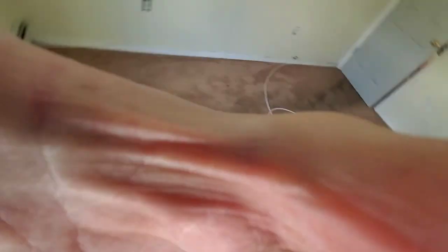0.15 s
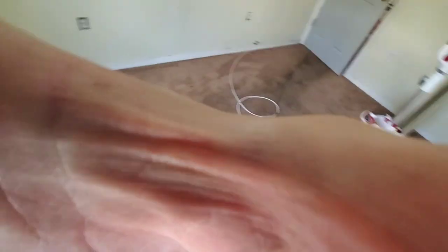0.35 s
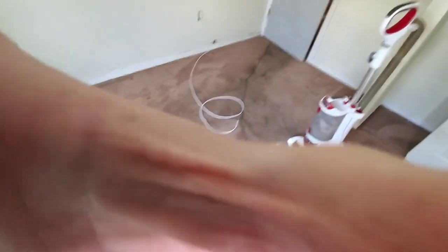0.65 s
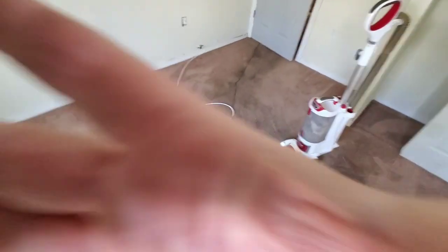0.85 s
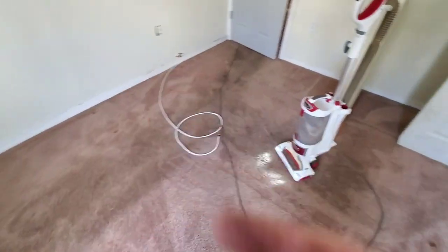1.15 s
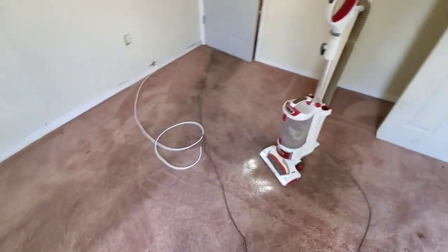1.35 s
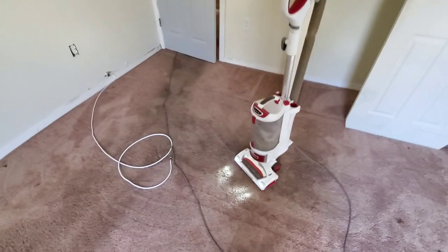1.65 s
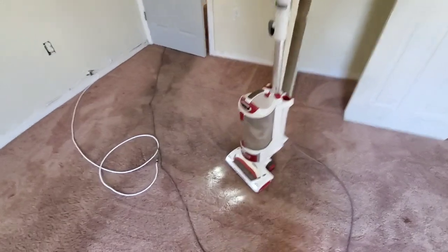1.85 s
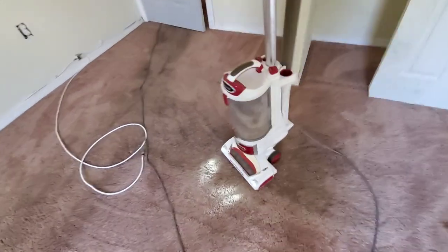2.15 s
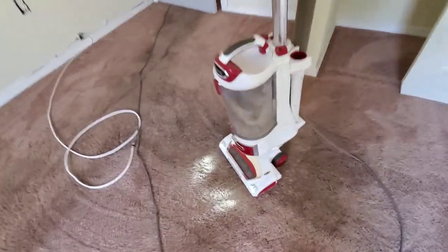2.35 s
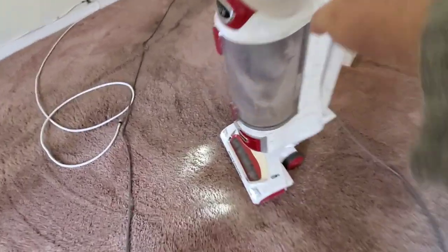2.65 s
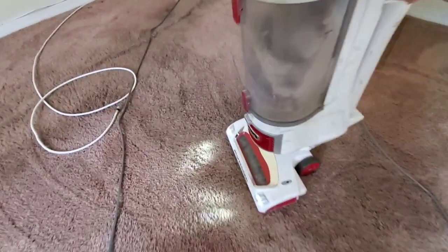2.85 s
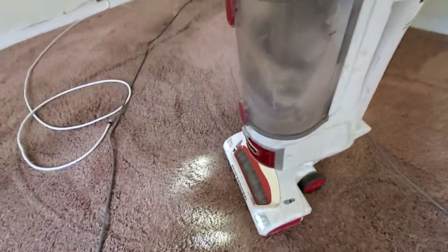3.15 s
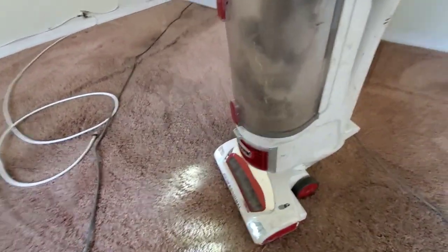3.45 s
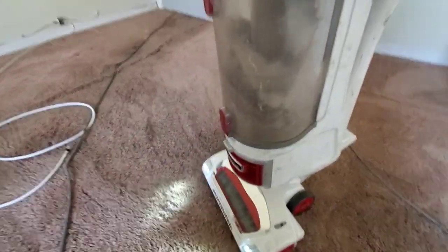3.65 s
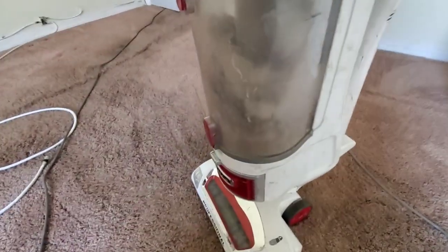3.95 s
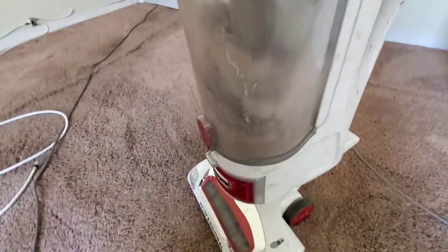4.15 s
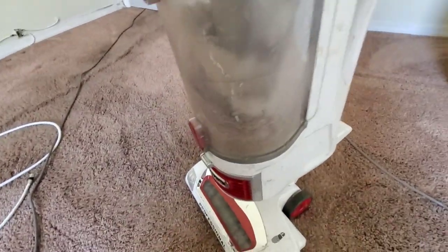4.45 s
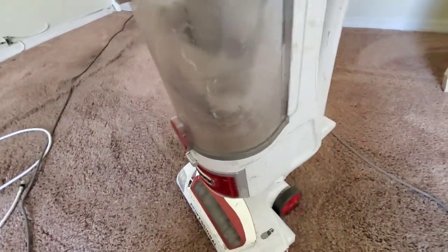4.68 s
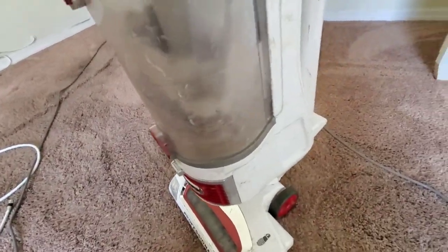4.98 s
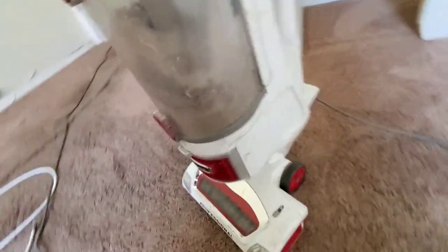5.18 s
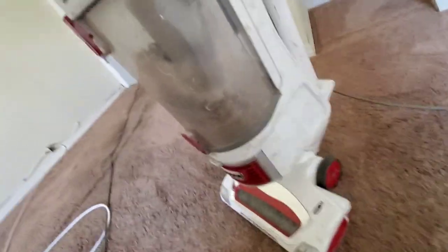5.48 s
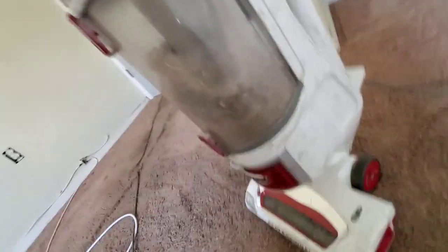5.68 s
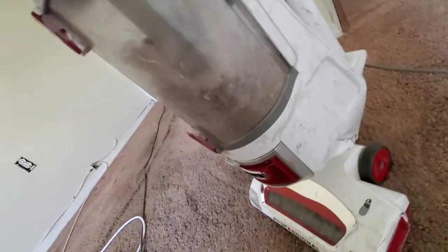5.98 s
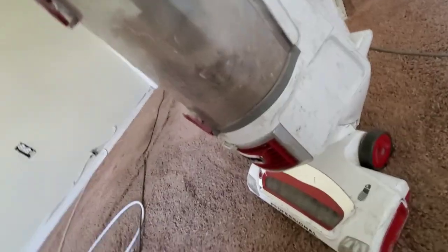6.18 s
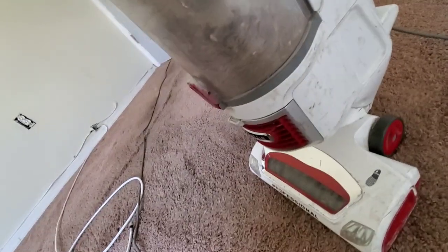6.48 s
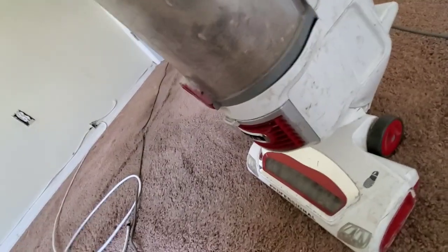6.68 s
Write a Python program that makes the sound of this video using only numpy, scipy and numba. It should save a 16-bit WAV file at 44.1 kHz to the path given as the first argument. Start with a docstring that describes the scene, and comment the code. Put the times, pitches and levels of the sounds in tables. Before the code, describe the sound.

In an empty carpeted room an upright vacuum runs steadily: motor hum, rushing air, a breathy whistle and dense gritty hiss. A hand rumbles and rustles on the handheld phone for the first second, muffling the right side. The phone moves close to the plastic bin; the motor is switched off, its hum falls, grit thins to single ticks, and finally the bin unlatches with clicks, low knocks and a scrape.

```python
"""Vacuum cleaner switched off and its bin lifted

An upright cleaner runs on carpet in an empty room: sines hum for its fan and brush drive, filtered noise
makes the rush of air and the whistle, and random grains of grit tick and ring in its plastic cyclone bin.
A hand rubs on the phone and muffles its right microphone for the first second. After switch-off the hum
falls and the grit thins into single ticks; then the bin is unlatched with clicks, knocks and a scrape."""
import sys
import numpy as np
from scipy import signal
from scipy.fft import rfft, irfft
from scipy.io import wavfile
from scipy.ndimage import uniform_filter1d
from numba import njit

SR = 44100
rng = np.random.default_rng(int(sys.argv[2]) if len(sys.argv) > 2 else 0)


def unload_audio(sound):
    """Save the sound as a 16-bit wav file, at the path given as the first command line argument."""
    columns = np.transpose(np.atleast_2d(sound))
    # keep every value between -1 and 1, then stretch to whole-number steps
    steps = np.round(np.clip(columns, -1, 1) * 32767)
    wavfile.write(sys.argv[1], SR, steps.astype(np.int16))


N = 300762
T = np.arange(N) / SR  # time of every sample, in seconds

# Colour of the bin wall's ring. Each row: frequency in Hz, relative level in dB.
WALL_SPECTRUM = [(600, -44.5), (1000, -13), (1200, -8.5), (1400, -10.5), (1530, -4.5), (1680, -4),
                 (1980, 1), (2350, 0), (2560, 1.5), (2800, -0.5), (3280, 1.5), (3700, 0.5), (4100, -2.5),
                 (4800, -8.5), (6500, -10.5), (12000, -14.5)]
# Colour of the grains' ticks. Each row: frequency in Hz, relative level in dB.
TICK_SPECTRUM = [(2000, -39.5), (4500, 0.5), (5500, -6), (7000, 0), (7700, -1.5), (9000, 2.5), (10200, 3),
                 (11000, 1), (12200, 5), (14000, -2), (16000, 2.5)]

# fan shaft: turns per second, switch-off time, and slowing by air drag (at full speed) and by friction
RUN_HZ, OFF_S, DRAG_HZ_PER_S, FRICTION_HZ_PER_S = 615, 3.855, 459, 53.1
# the phone moves in close to the bin between these times
APPROACH_S, CLOSE_S = 2.1, 2.95
LAP_S = .04608  # time of one lap of the vortex
ROOM_T60_S = 1  # time for the room's echo to fall by 60 dB


def undb(db):
    """Turn decibels into a gain."""
    return 10 ** (np.asarray(db) / 20)


def curves(table):
    """The columns of a table, joined by straight lines in time."""
    s, *columns = np.transpose(table)
    return [np.interp(T, s, c) for c in columns]


def humps(x, rows):
    """Sum of bell-shaped swells, each (centre, width, height)."""
    return sum(height * np.exp(-((x - centre) / width) ** 2) for centre, width, height in rows)


def unit(x):
    """Scale to an rms level of 1."""
    return x / np.sqrt(np.mean(x ** 2, axis=-1, keepdims=True))


def sides(db):
    """Left and right gains for a level difference, left minus right."""
    gains = np.array([undb(np.atleast_1d(db) / 2), undb(-np.atleast_1d(db) / 2)])
    return gains / np.sqrt(np.mean(gains ** 2, axis=0))


def walk(rate):
    """Smooth random wandering with about `rate` new values a second and a spread near 1."""
    k = int(SR / rate)
    held = np.repeat(rng.standard_normal(N // k + 1), k)
    return unit(uniform_filter1d(held, k)[:N])


def convolve(x, response):
    """Pass every channel of x through a response."""
    x = np.atleast_2d(x)
    return signal.fftconvolve(x, np.atleast_2d(response), axes=-1)[:, :x.shape[-1]]


def colour(x, spectrum, size=4096):
    """Filter with the given spectrum and unit energy that only looks back in time."""
    hz, db = np.transpose(spectrum)
    log_hz = np.log(np.fft.rfftfreq(size, 1 / SR) + 1)
    # folding the cepstrum packs the response as early as it can be (minimum phase)
    cepstrum = irfft(np.log(undb(np.interp(log_hz, np.log(hz), db))))
    cepstrum[1:size // 2] *= 2
    cepstrum[size // 2 + 1:] = 0
    response = irfft(np.exp(rfft(cepstrum)))
    return convolve(x, unit(response) / np.sqrt(size))


@njit
def svf(x, hz, damping):
    """State-variable filter with a moving centre: low-pass and band-pass."""
    out, b, l = np.empty((2, len(x))), 0., 0.
    for i in range(len(x)):
        g = np.tan(np.pi * hz[i] / SR)
        v = (b + g * (x[i] - l)) / (1 + g * (g + damping))
        out[0, i], out[1, i] = l + g * v, damping * v
        b, l = 2 * v - b, l + 2 * g * v
    return out


def resonance(x, hz, width_hz):
    """A fixed band-pass, gain 1 at the centre."""
    return signal.lfilter(*signal.iirpeak(hz, hz / width_hz, fs=SR), x)


def add(out, s, sound):
    """Mix a sound in at a time."""
    i = int(s * SR)
    out[:, i:i + sound.shape[-1]] += sound[:, :N - i]


def diffuse(alike_hz=900):
    """Room-filling noise: long waves are nearly the same at both microphones."""
    mid, side = rng.standard_normal((2, N))
    side = signal.sosfilt(signal.butter(1, alike_hz, "high", fs=SR, output="sos"), side)
    return mid + side * np.array([[1], [-1]])


def ringing(energy, t60):
    """Countless close modes: each blow leaves a dying puff of noise, different at each microphone."""
    keep = np.exp(-2 * np.log(1000) / (t60 * SR))
    return np.sqrt(signal.lfilter([1 - keep], [1, -keep], energy)) * rng.standard_normal((2, N))


def room(energy, wet_db):
    """Bare walls prolong the blows with a dying tail of noise."""
    return undb(wet_db) * ringing(energy, ROOM_T60_S)


def struck(modes, size=6000):
    """Damped modes after one blow, a little different in pitch each time."""
    t = np.arange(size) / SR
    sound = np.zeros(size)
    for hz, db, t60 in modes:
        pitch = hz * (1 + 0.014 * rng.standard_normal())
        sound += undb(db) * np.exp(-np.log(1000) * t / t60) * np.sin(2 * np.pi * pitch * t)
    return sound


def speed():
    """Share of full fan speed: steady, then braked by drag (as speed squared) and constant friction."""
    knee = np.sqrt(FRICTION_HZ_PER_S / DRAG_HZ_PER_S)  # the share at which both brake equally
    coasted = np.maximum(T - OFF_S, 0) * knee * DRAG_HZ_PER_S / RUN_HZ
    return knee * np.tan(np.arctan(1 / knee) - coasted)


def nearness():
    """0 across the room, 1 beside the bin."""
    return np.interp(T, [APPROACH_S, CLOSE_S], [0, 1])


def skin(cover, gap_hz):
    """The palm rumbles and bumps on the phone; its rustle grows from the slide to the peeling off."""
    # The palm bumping the phone. Each row: start in seconds, thump level in dB, skin rumble level in dB.
    bumps = [(.003, -17, -23), (.032, -16, -25), (.054, -11, -20), (.147, -8, -25), (.163, -14, -27),
             (.208, -5, -21), (.33, -19, -30), (.579, -10, -24), (.64, -17, -27), (.803, -9, -24),
             (.889, -13, -20), (.91, -11, -18), (.927, -7, -16), (.936, -7, -16), (.955, 0, -18)]
    # Colour of the skin's rumble. Each row: frequency in Hz, relative level in dB.
    rumble_spectrum = [(20, -8), (45, -2.5), (80, 0), (130, -20.5), (250, -24), (700, -32), (3000, -37),
                       (16000, -68)]
    thump_modes = [(59.5, -7.5, 0.07), (106, -4.5, 0.013)]  # Hz, relative dB, 60 dB decay in seconds
    slip_s, peel_s = .8, .938  # the palm starts to slide, then peels off
    rest_db, rustle_rest_db, slip_db, peel_db, hiss_db = -34, -46, -35, -13, -15
    catch_db = 2  # how unevenly the skin catches and slips
    bump_s, touch_hz = 0.013, 3500  # fading time of a bump's rumble; gap pitch at which touch is lost

    touching = cover / (1 + (gap_hz / touch_hz) ** 8)
    pressure = undb(rest_db + catch_db * walk(21.2)) * touching
    for s, _, db in bumps:
        pressure += undb(db) * (T >= s) * np.exp(-np.abs(T - s) / bump_s)
    rumble = pressure * unit(colour(rng.standard_normal(N), rumble_spectrum))
    for s, db, _ in bumps:
        add(rumble, s, undb(db) * struck(thump_modes)[None])

    rustle_db = np.where(T < slip_s, rustle_rest_db, np.interp(T, [slip_s, peel_s], [slip_db, peel_db]))
    in_gap = svf(rng.standard_normal(N), gap_hz, 1.0)[0] * np.sqrt(SR / np.pi / gap_hz)
    hiss_spectrum = [(1500, -5), (3500, -7), (7000, -20), (16000, -26)]
    hiss = undb(hiss_db) * colour(rng.standard_normal(N), hiss_spectrum)[0]
    rustle = undb(rustle_db + catch_db * walk(110)) * touching * (in_gap + hiss)
    return signal.sosfilt(signal.butter(2, 24, "high", fs=SR, output="sos"), rumble[0] + rustle)


def hand(sound):
    """A palm muffles the right port and shades the left; the gap passes more as its pitch rises."""
    # The gap under the palm. Each row: time in seconds, resonance in Hz.
    gap_pitch = [(0, 300), (.57, 410), (.62, 2200), (.67, 3000), (.71, 4870), (.75, 5740), (.785, 4300),
                 (.81, 500), (.87, 260), (.925, 420), (.938, 800), (.951, 1300), (.955, 6000),
                 (.959, 11500), (.968, 14000)]
    lift_s, lift_time_s = .96, .015  # the palm leaves the port
    open_db, open_hz, gap_db_per_octave = -3.5, 5500, 5.0  # the gap loses level below open_hz
    leak_db, shade_db, cup_db = -18, -2, 2.5
    leak_spectrum = [(100, 0), (650, 4.0), (1500, -4.0), (3800, -9),
                     (5500, -14), (7300, -24), (8800, -13), (15000, -37)]

    left, right = sound
    gap_hz = np.clip(curves(gap_pitch)[0], 50, SR / 3)
    cover = np.interp(T, [lift_s, lift_s + lift_time_s], [1, 0])
    leak = undb(leak_db) * colour(right, leak_spectrum)[0]
    gap_db = open_db + gap_db_per_octave * np.minimum(np.log2(gap_hz / open_hz), 0)
    through_gap = undb(gap_db) * svf(svf(right, gap_hz, 0.36)[0], gap_hz, 27)[1]
    right = (1 - cover) * right + cover * (leak + through_gap)
    # at first the palm also reflects treble into the left port
    glint = 1.17 * resonance(left, 9300, 4000) + 0.87 * resonance(left, 12700, 1060)
    glint -= 0.31 * resonance(left, 8700, 16000)
    left = (left + glint * np.interp(T, [.62, .72], [1, 0])) * undb(shade_db * cover)
    # as it lifts, the hollow of the hand briefly gathers the sound
    cupped = undb(humps(T, [(lift_s + lift_time_s / 2, lift_time_s, cup_db)]))
    return cupped * np.array([left, right]) + np.array([[0], [1]]) * skin(cover, gap_hz)


def motors():
    """The unbalanced fan hums at its shaft rate; the brush drive's steady note just above beats with it."""
    # Room standing waves that the falling hum sweeps through. Each row: centre in Hz, width in Hz, gain in dB.
    standing_waves = [(596, 9, 7), (536, 9.2, 3), (506, 13, 8.5), (478, 9.5, 8.5), (432, 22, -0.5),
                      (383.5, 13, -23), (318, 45, -9.5), (238, 3.8, -16), (223.6, 4.8, -20),
                      (199, 10, -11.5), (150, 17, 6)]
    # Hums of the brush roll. Each row: frequency in Hz, level in dB relative to the roll.
    brush_lines = [(119.7, -1), (179.8, 2), (213, -2), (256.5, 4), (302, 0)]
    hum_db, hum_near_db = -47.5, 5  # from afar, and its change close up
    brush_hz, note_db, roll_db, roll_near_db = 641.6, -40.5, -57.5, -15
    brush_stop_db_per_s = 221
    fan_flutter_db, lap_db, fan_wander, fan_jitter = 3, 2, .004, .011  # the last two are shares of speed
    note_flutter_db, roll_flutter_db = 2.6, 3  # the carpet loads the brush drive and roll unevenly

    hz, near = RUN_HZ * speed(), nearness()
    stop_db = -brush_stop_db_per_s * np.maximum(T - OFF_S, 0)
    lag = np.array([[0], [0.45]])  # the right channel's phase shift, in radians
    # the air load shakes the fan mostly while it turns fast, at random and with each lap of the vortex
    load = speed() ** 3
    shaken_hz = hz * (1 + load * (fan_wander * walk(1.5) + fan_jitter * walk(30)))
    turn = 2 * np.pi * np.cumsum(shaken_hz) / SR
    flutter = fan_flutter_db * walk(60) + lap_db * np.sin(2 * np.pi * T / LAP_S)
    fan_db = hum_db + hum_near_db * near + humps(hz, standing_waves) + load * flutter
    fan = undb(fan_db) * np.sin(turn + lag * load)

    note_phase = 2 * np.pi * brush_hz * T + 0.71 * walk(5.0) + lag
    note = undb(note_db + stop_db + note_flutter_db * walk(32)) * np.sin(note_phase)
    roll = np.zeros(N)
    for line_hz, db in brush_lines:
        level_db = roll_db + roll_near_db * near + stop_db + db + roll_flutter_db * walk(11.0)
        roll += undb(level_db) * np.sin(2 * np.pi * line_hz * T + 0.5 * walk(9))
    return np.sqrt(2) * (fan + note + roll)


def air(air_db):
    """Turbulent exhaust air fills the room as noise; it grows duller and calmer as the fan slows."""
    # Colour of the rushing air. Each row: frequency in Hz, relative level in dB.
    air_spectrum = [(30, -26), (70, -22), (110, -5), (170, -7), (290, 3), (380, -4), (470, -1), (600, 3),
                    (900, 3), (1300, 1.5), (2200, -1.5), (5000, -4), (15000, -20)]
    gain_db, least_db, flutter_db = 4.5, -48, 2
    reach, damping = 6.1, 2.5  # the low-pass edge lies at `reach` times the shaft rate
    edge_hz = np.clip(reach * RUN_HZ * speed(), 100, SR / 3)
    rush = np.array([svf(x, edge_hz, damping)[0] for x in colour(diffuse(), air_spectrum)])
    level = np.hypot(undb(air_db), undb(least_db))  # never quite silent
    return rush * level * undb(gain_db + flutter_db * speed() * walk(30))


def whirl():
    """Level of the grit in dB: it comes in surges, and wavers close to the bin."""
    # Level of the whirling grit. Each row: time in seconds, level in dB.
    whirl_level = [(1.0, -19.5), (1.93, -21.5), (2.0, -20.5), (2.62, -21), (2.82, -25), (3.72, -27.5),
                   (3.87, -22), (5.34, -33), (5.76, -35), (6.21, -39.5), (6.46, -40), (6.55, -48.5)]
    # Passing clumps of grit and lulls between them. Each row: centre in seconds, change in dB.
    surge_rows = [(1.08, 0.5), (1.17, -0.5), (1.43, 1), (1.52, 0.5), (1.9, -2), (2.28, 1), (2.58, 0.5),
                  (2.88, -3), (3.22, 2.5), (3.37, -2.5), (3.42, 1.5), (3.47, -1.5), (3.58, 2), (3.79, 3),
                  (4.21, 2.5), (4.52, -5), (4.61, 2.5), (4.68, -4.5), (5.0, -2.5), (5.91, -6.5)]
    surge_s, waver_db = .028, 0.82  # half-length of a surge; size of the wavering
    surges = humps(T, [(s, surge_s, db) for s, db in surge_rows])
    return curves(whirl_level)[0] + surges + waver_db * nearness() * walk(60)


def steady(x, seconds=0.19):
    """Even out the slow level of a sound."""
    return x / np.sqrt(uniform_filter1d(np.mean(x ** 2, axis=0), int(seconds * SR)) + 1e-9)


def from_bin(x):
    """Part of the bin's ring arrives directly and reaches the left microphone a little late."""
    direct_share, port_lag_s = .12, .00019
    left, right = x
    late = np.roll(right, int(port_lag_s * SR))
    return np.array([np.sqrt(1 - direct_share) * left + np.sqrt(direct_share) * late, right])


def facing(x):
    """Close up, the wall beams its top octave and lower treble recedes; slower grains tick lower."""
    near_db, slow_db, scoop_db, fill_db = 7, -7, -11.5, 6.0
    lift_db = near_db * nearness() + slow_db * (1 - speed()) ** 2
    scoop = undb(scoop_db * nearness() * speed() + fill_db * (0.5 - speed())) - 1
    return x + (undb(lift_db) - 1) * resonance(x, 14200, 2560) + scoop * resonance(x, 6600, 6100)


def whistle(whirl_db):
    """Turbulence rings the bin's air cavity; narrow noise drifts in pitch, flutters and swells."""
    # The breathy whistle. Each row: time in seconds, pitch in Hz, level in dB relative to the whirl.
    whistle_track = [(0, 1680, -15), (.25, 1690, -9.5), (.75, 1700, -9), (1.1, 1666, -12), (1.5, 1740, -8),
                     (1.9, 1738, -6), (2.3, 1672, -6), (2.7, 1672, -5.5), (2.95, 1670, -12.5),
                     (3.6, 1680, -13), (3.9, 1650, -10.5), (4.5, 1680, -14), (5.6, 1740, -16)]
    # Its swells and lulls. Each row: centre in seconds, change in dB.
    swell_rows = [(1.14, -7), (1.5, 3.5), (1.62, -2), (1.74, 2), (1.88, -3), (2.02, 3), (2.09, -3),
                  (2.17, 4), (2.41, 2.5), (2.49, -7), (2.6, 0), (2.75, -2)]
    swell_s, flutter_db = .035, 1.6  # half-length of a swell; size of the quick flutter
    width = .052  # as a share of the pitch
    hz, db = curves(whistle_track)
    hz = hz * (1 + 0.007 * walk(40))
    tone = []
    for noise in rng.standard_normal((2, N)):
        narrow = svf(noise, hz, width)[1]
        tone.append(svf(narrow, hz, 4 * width)[1])
    swells = humps(T, [(s, swell_s, height) for s, height in swell_rows])
    return steady(from_bin(tone), seconds=0.097) * undb(whirl_db + db + swells + flutter_db * walk(80))


def grit(ring_db, sizzle_db):
    """Sand circles the bin in clumps; each grain ticks on the wall and rings the shell."""
    far_grains_per_s, near_grains_per_s = 6900, 2700  # grains heard at full speed
    thinning, spread_db, clump_db, pan_db = 2.2, 2.0, 4.0, 1
    heard = far_grains_per_s + (near_grains_per_s - far_grains_per_s) * nearness()
    mean_rate = heard * speed() ** thinning
    rate = mean_rate * undb(clump_db * np.tanh(walk(55)))
    size = undb(spread_db * np.minimum(rng.exponential(size=N), 4.4))
    energy = size ** 2 * (rng.random(N) < rate / SR)
    ticks = ringing(energy, 0.00044) + 1.6 * ringing(energy, 0.008) + room(energy, wet_db=-2)
    rings = ringing(energy, 0.014) + room(energy, wet_db=2.5)
    # the fewer the grains, the more each passing clump stands out
    clumps = unit(np.tanh(walk(110)))
    swell_db = np.clip(4500 / mean_rate, 0, 1.4) * (clumps - uniform_filter1d(clumps, SR // 22))
    sizzle = steady(facing(colour(ticks, TICK_SPECTRUM))) * undb(sizzle_db + swell_db) * sides(pan_db)
    shell = steady(from_bin(colour(rings, WALL_SPECTRUM))) * undb(ring_db + swell_db)
    return sizzle + shell


def floor():
    """A faint noise rumble of the house and of the hand-held phone, whose level drifts."""
    # Colour of the rumble. Each row: frequency in Hz, relative level in dB.
    floor_spectrum = [(20, -8), (60, 4), (150, 2.5), (280, 1.5), (450, -1), (1200, -7), (4000, -13),
                      (16000, -30)]
    # Loudness of the rumble. Each row: time in seconds, level in dB.
    floor_level = [(0, -48), (2.3, -61), (3.7, -55), (4.6, -60), (5.1, -52.5), (5.6, -50), (6.3, -45.5),
                   (6.82, -40)]
    return unit(colour(diffuse(alike_hz=200), floor_spectrum)) * undb(curves(floor_level)[0] + 2 * walk(9))


def strays(whirl_db):
    """Scattered grains near the phone tick unevenly and thin out: rows (seconds, tick dB, ring dB)."""
    strays_per_s = 75  # at full speed, close up
    tick_db, ring_db, spread_db = 12, -3.5, 2  # the first two are relative to the whirl
    carried_db = -6  # they stand out less while the air carries them at full speed
    last_speed = .33  # share of full fan speed below which no more of these scattered ticks are played
    chance = rng.standard_normal((450, 2))
    due = np.cumsum(np.exp(.6 * chance[:, 0]))  # uneven gaps, counted in grains
    s = np.interp(due, np.cumsum(strays_per_s * nearness() * speed() ** .7) / SR, T)
    db = np.interp(s, T, whirl_db + carried_db * speed() ** 2) + spread_db * chance[:, 1]
    played = np.interp(s, T, speed()) > last_speed
    return np.column_stack([s, db + tick_db, db + ring_db])[played]


def circling():
    """One grain in the vortex hits once a lap until switch-off: rows (seconds, tick dB, ring dB)."""
    from_s, lap_tick_db, ring_db = 2.7465, (-14, -11.5), -19  # tick levels run from first to last lap
    s = np.arange(from_s, OFF_S - LAP_S / 2, LAP_S)
    db = np.interp(s, [from_s, OFF_S], lap_tick_db) + rng.standard_normal(len(s))
    return np.column_stack([s, db, db + ring_db])


def single_grains(whirl_db):
    """Grains heard as single ticks skip when slow and wake the shell's lowest mode."""
    # Single grains striking the wall, from loud to faint.
    # Each row: start in seconds, tick level and wall ring level in dB, both before the gains below.
    tick_rows = [(3.3401, -13, -29), (3.4174, -10.5, -27), (3.424, -11, -28), (3.4505, -13, -32),
                 (3.498, -14, -32), (3.5425, -15, -32), (3.6675, -7, -24), (3.683, -14, -32),
                 (3.7305, -14, -32), (3.8998, -11, -26), (3.9168, -10, -26), (3.9677, -11, -26),
                 (4.0191, -10, -24), (4.1009, -11, -27), (4.1572, -10, -25), (4.1902, -11, -25),
                 (4.2036, -11, -22), (4.3178, -11, -27), (4.3392, -11, -27), (4.3866, -12, -27),
                 (4.4056, -11.5, -27), (4.463, -11, -26), (4.4745, -11, -28), (4.5109, -13, -27),
                 (4.5481, -8, -23), (4.6286, -11, -28), (4.6335, -8, -27), (4.7012, -8, -25),
                 (4.7279, -10.5, -28), (4.7827, -13, -28), (4.7952, -11, -29), (4.8085, -9, -28),
                 (4.819, -13, -30), (4.8614, -9.5, -25), (4.9092, -13, -25), (4.9541, -10, -25),
                 (4.997, -11, -28), (5.0444, -11, -28), (5.0669, -15, -29), (5.083, -16, -32),
                 (5.092, -16, -32), (5.1058, -10, -24), (5.1082, -11, -25), (5.1324, -14, -30),
                 (5.1544, -14, -30), (5.1878, -14, -32), (5.208, -17, -32), (5.2225, -10.5, -27),
                 (5.2482, -16, -28), (5.2761, -6, -24), (5.2985, -17, -32), (5.337, -15.5, -30),
                 (5.3554, -16, -32), (5.4203, -15, -29), (5.4465, -14, -27), (5.4524, -13, -30),
                 (5.4677, -9.5, -28), (5.477, -15, -32), (5.4856, -13, -29), (5.5468, -17, -28),
                 (5.559, -14, -29), (5.5829, -11, -23), (5.6045, -20, -33), (5.6201, -12, -29),
                 (5.6535, -13.5, -29), (5.682, -13, -30), (5.7024, -15, -29), (5.7084, -16, -28),
                 (5.7404, -11, -28), (5.7623, -15, -30), (5.7655, -16, -32), (5.777, -14, -33),
                 (5.7844, -17, -31), (5.8074, -18, -31), (5.8202, -14, -31), (5.8518, -18, -32),
                 (5.8855, -13.5, -32), (5.9314, -13, -31), (5.9626, -18, -34), (5.9764, -19, -36),
                 (5.983, -18, -36), (5.9885, -17, -36), (6.0132, -17, -34), (6.0295, -20, -36),
                 (6.0405, -23, -38), (6.0705, -23, -38), (6.0806, -18, -33), (6.105, -22, -35),
                 (6.129, -18, -33), (6.1649, -22, -35), (6.197, -19, -34), (6.2347, -18, -34),
                 (6.2595, -25, -40), (6.3108, -16, -32), (6.3275, -24, -40), (6.3542, -21, -35),
                 (6.3699, -18, -34), (6.3985, -23, -38), (6.4085, -23, -39), (6.4198, -20, -36),
                 (6.4565, -25, -39), (6.5085, -28, -43), (6.573, -22, -39)]
    # Where ticks come from as the phone moves round. Each row: time in seconds, left minus right in dB.
    tick_pan = [(4.2, 5), (4.55, 7), (5.45, 8), (5.8, 3.5), (6.0, -3)]
    tick_gain_db, ring_gain_db, mode_db = 13, 22, 2
    skip_s, skip_share = .0013, .5  # delay of a second touch; its energy share if the air were still
    s, tick, ring = np.vstack([tick_rows, circling(), strays(whirl_db)]).T
    at = (s * SR).astype(int)
    pan = curves(tick_pan)[0][at]
    on_wall, in_shell = np.zeros((2, 2, N))
    on_wall[:, at] = (undb(tick + tick_gain_db) * sides(pan)) ** 2
    in_shell[:, at] = (undb(ring + ring_gain_db) * sides(pan / 2)) ** 2
    skipping = on_wall * skip_share * (1 - speed())
    on_wall = on_wall - skipping + np.roll(skipping, int(skip_s * SR), axis=1)
    ticks = .5 * ringing(on_wall, .003) + 1.05 * ringing(on_wall, .011)
    ticks += room(on_wall, wet_db=-12)  # close and dry
    rings = colour(ringing(in_shell, .016), WALL_SPECTRUM)
    lowest_mode = undb(mode_db) * resonance(rings, 1900, 220)
    return facing(colour(ticks, TICK_SPECTRUM)) + rings + lowest_mode


def unlatch():
    """The catch snaps, the bin scrapes out of its seat and knocks the body."""
    # Blows of the unlatching. Each row: start in seconds, latch click level in dB, body knock level in dB.
    knocks = [(6.56, -42, -62), (6.581, -43, -62), (6.612, -38, -55), (6.658, -27, -42), (6.683, -42, -34),
              (6.704, -37, -48), (6.721, -39, -31), (6.733, -22, -35), (6.774, -38, -35), (6.791, -38, -24)]
    # Modes of the latch. Each row: frequency in Hz, relative level in dB, time to fall by 60 dB in seconds.
    latch_modes = [(620, -18, 0.034), (1090, -4, 0.028), (1250, 0.5, 0.023), (1900, -12, 0.045),
                   (2630, -9, 0.031), (3770, -3, .04), (5640, -22, .03)]
    # Modes of the body. Each row: frequency in Hz, relative level in dB, time to fall by 60 dB in seconds.
    body_modes = [(135, -22, 0.073), (186, 5.5, 0.075), (273, -15, .07), (497, 0, 0.043), (654, -7, 0.04)]
    # The bin sliding out. Each row: time in seconds, level in dB.
    slide = [(6.64, -94), (6.665, -41), (6.72, -43), (6.75, -42), (6.8, -25.5), (6.82, -32)]
    # Colour of the scrape. Each row: frequency in Hz, relative level in dB.
    scrape_spectrum = [(25, -28), (60, -24), (140, 14), (300, 0), (650, 4), (1300, -22), (2500, -14),
                       (5000, -21), (9000, -24), (16000, -25)]
    crack_spectrum = [(400, -5), (1200, 10.0), (4000, 4.5), (9000, -3.5), (16000, -6)]
    crack_db, jerk_db = 22, 4.2  # crack relative to the click; how jerkily the bin slides
    catches_per_s, catch_db = 170, 15  # the rim catching as it slides, relative to the slide

    out, snaps = np.zeros((2, N)), np.zeros(N)
    for s, click_db, knock_db in knocks:
        add(out, s, undb(click_db) * np.array([struck(latch_modes), struck(latch_modes)]))
        add(out, s, undb(knock_db) * struck(body_modes)[None])
        snaps[int(s * SR)] = undb(click_db + crack_db) ** 2
    slide_db = curves(slide)[0]
    snaps += (rng.random(N) < catches_per_s / SR) * undb(slide_db + catch_db) ** 2
    crack = colour(ringing(snaps, 0.047) + room(snaps, wet_db=3.0), crack_spectrum)
    scrape = unit(colour(diffuse(), scrape_spectrum)) * undb(slide_db + jerk_db * walk(110))
    return out + crack + scrape


def scene():
    """Mix the cleaner, its bin and the faint rumble; air, ring and sizzle follow the whirl."""
    db = whirl()
    air_db = db - 17 - 0.4 * nearness()
    # the fine sizzle sinks beneath the single ticks as the fan slows
    sizzle_db = db + 2 - 1.5 * (1 - speed())
    bin_sounds = whistle(db) + grit(db + 1, sizzle_db) + single_grains(db)
    return motors() + air(air_db) + bin_sounds + unlatch() + floor()


def record(dry):
    """Each port of the hand-held phone has its own colour; the hand covers the right one; the top is cut."""
    left, right = dry
    left_port = left + 0.29 * resonance(left, 1440, 1100)
    right_port = right + 0.5 * resonance(right, 6540, 2400) - 0.16 * resonance(right, 2300, 950)
    top_cut = signal.ellip(12, .2, 80, 15800, fs=SR, output="sos")  # low-pass at 15800 Hz
    return signal.sosfilt(top_cut, hand([left_port, right_port]))


dry = scene()
out = record(dry)
unload_audio(out)
```